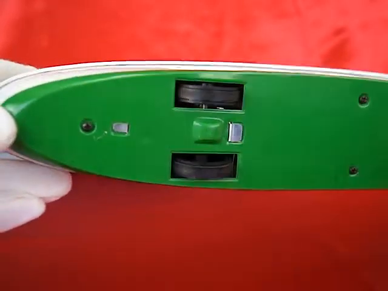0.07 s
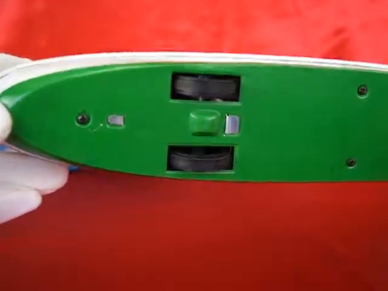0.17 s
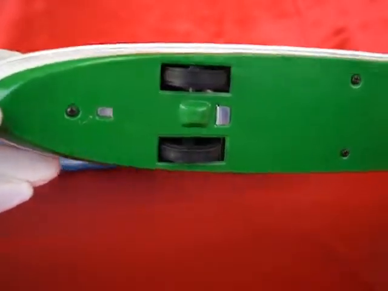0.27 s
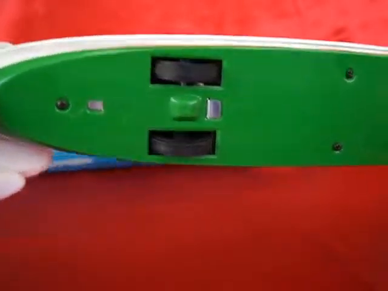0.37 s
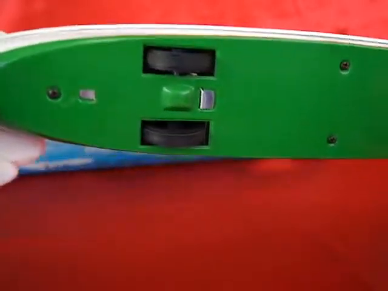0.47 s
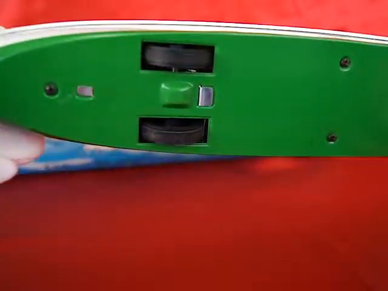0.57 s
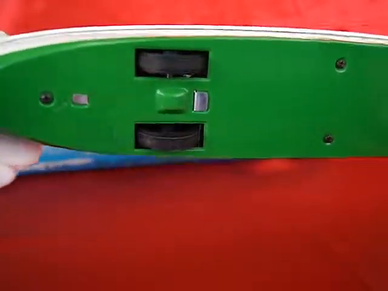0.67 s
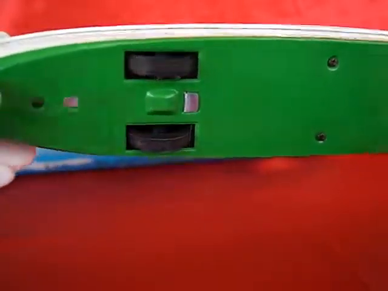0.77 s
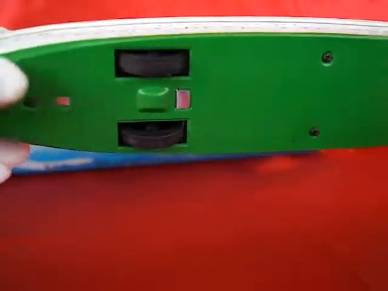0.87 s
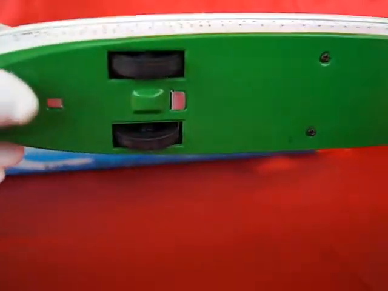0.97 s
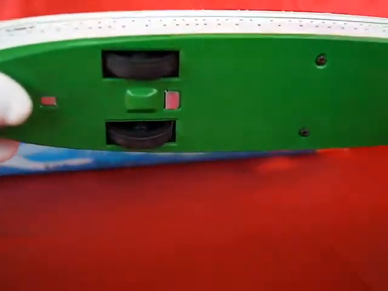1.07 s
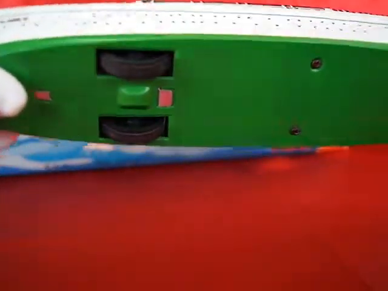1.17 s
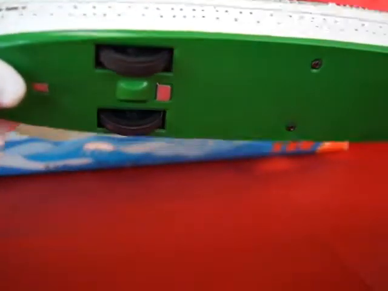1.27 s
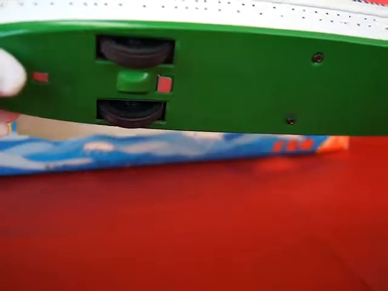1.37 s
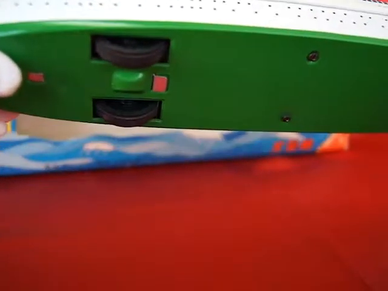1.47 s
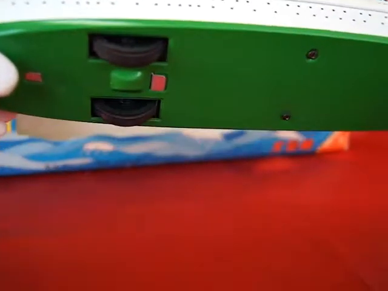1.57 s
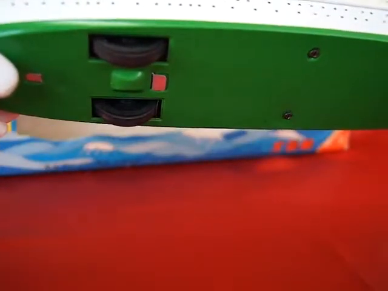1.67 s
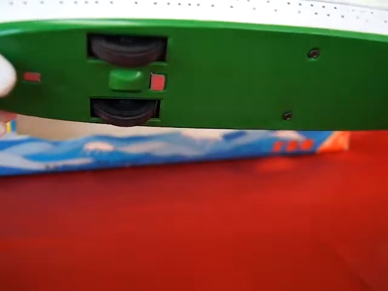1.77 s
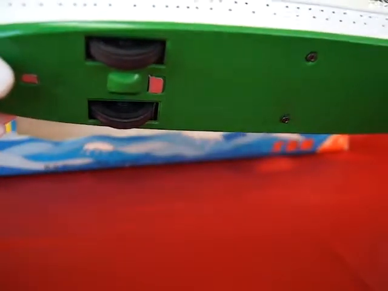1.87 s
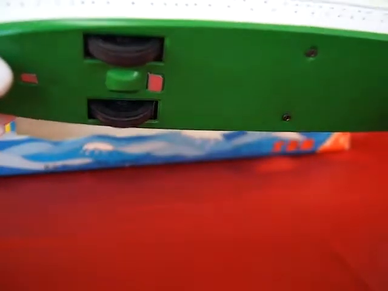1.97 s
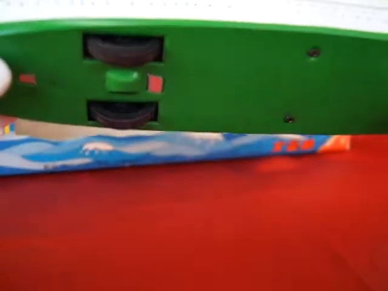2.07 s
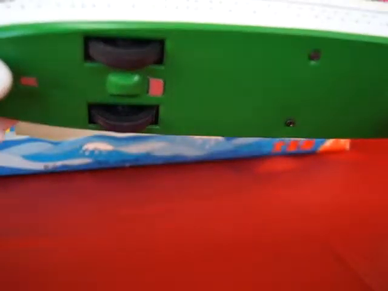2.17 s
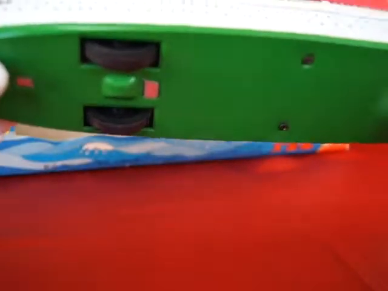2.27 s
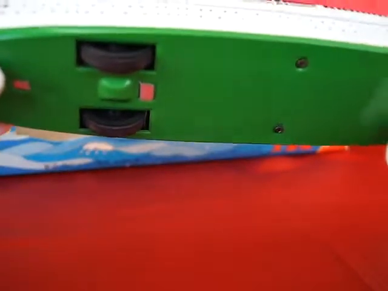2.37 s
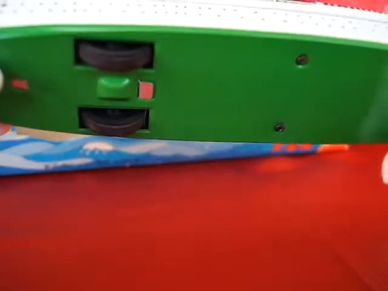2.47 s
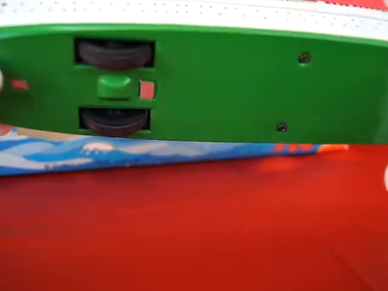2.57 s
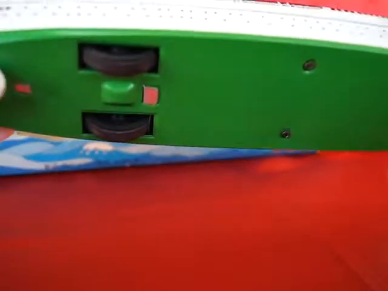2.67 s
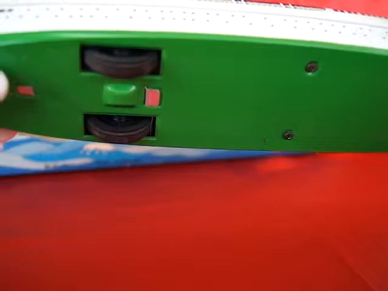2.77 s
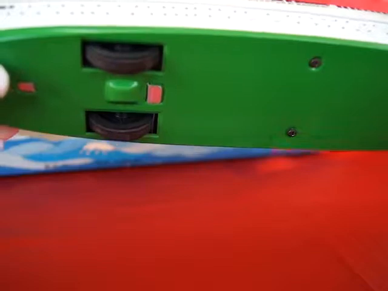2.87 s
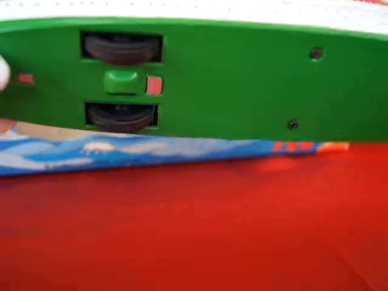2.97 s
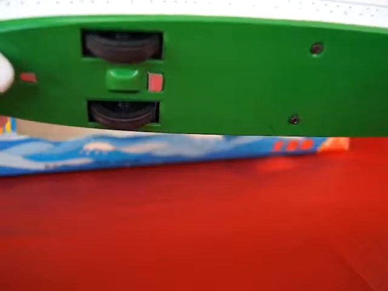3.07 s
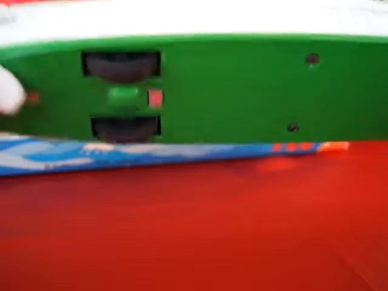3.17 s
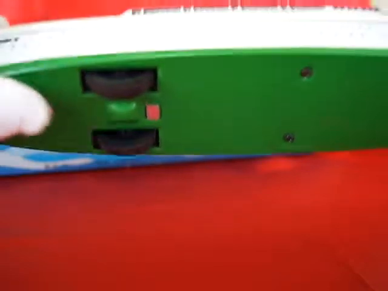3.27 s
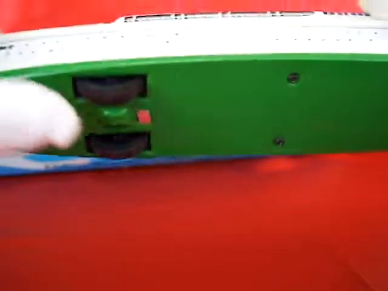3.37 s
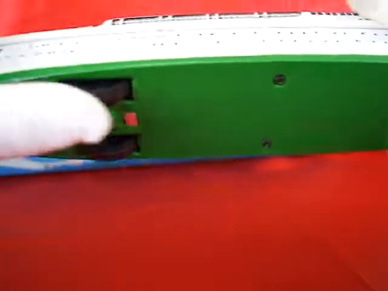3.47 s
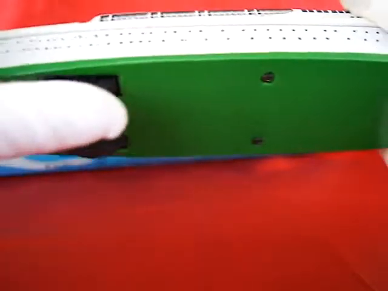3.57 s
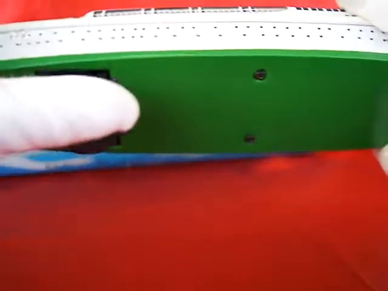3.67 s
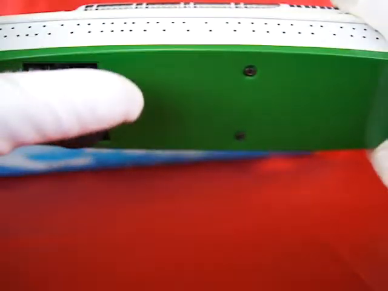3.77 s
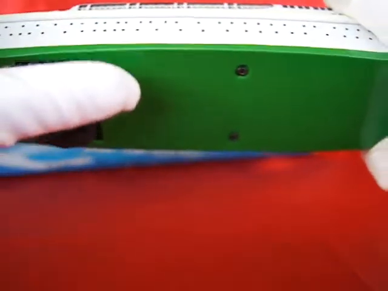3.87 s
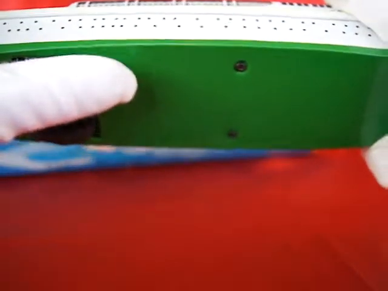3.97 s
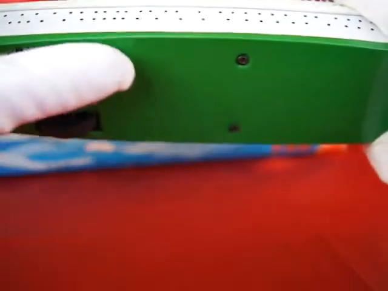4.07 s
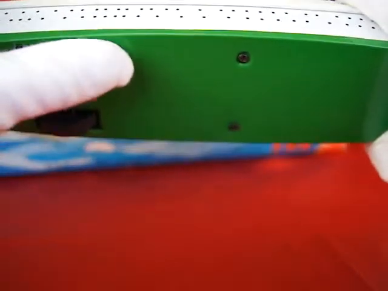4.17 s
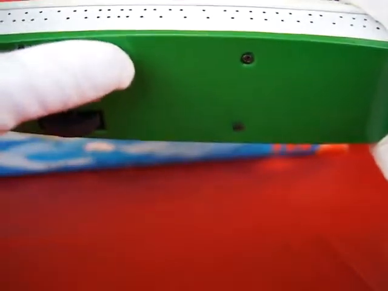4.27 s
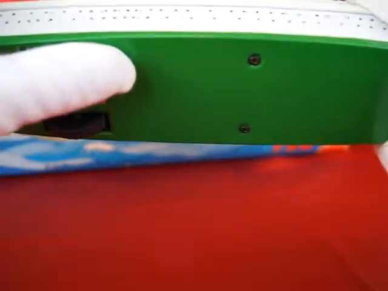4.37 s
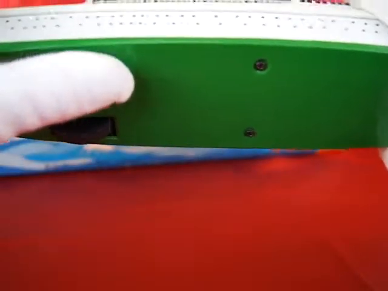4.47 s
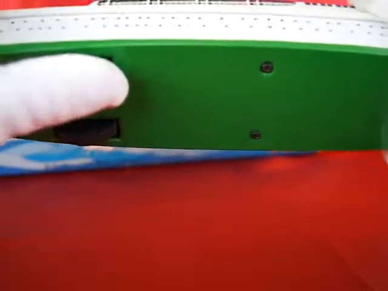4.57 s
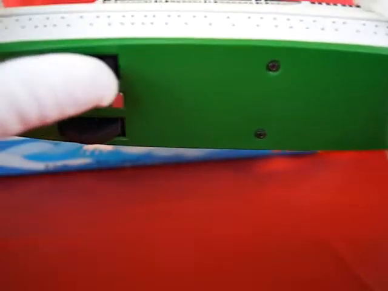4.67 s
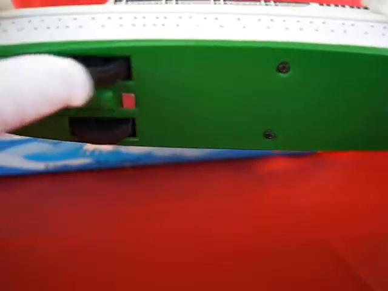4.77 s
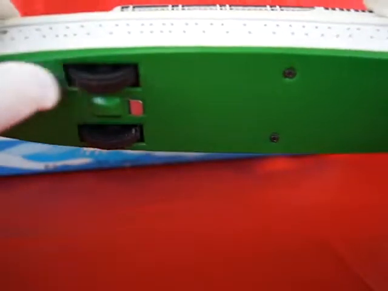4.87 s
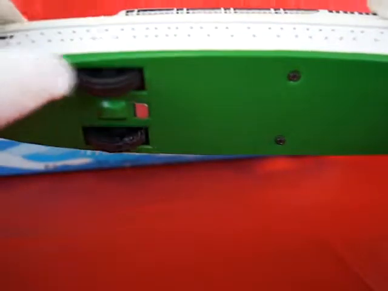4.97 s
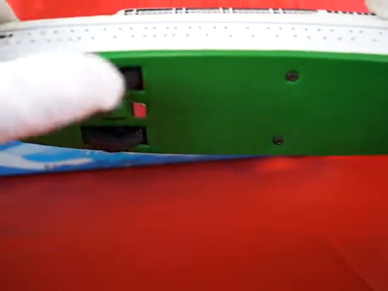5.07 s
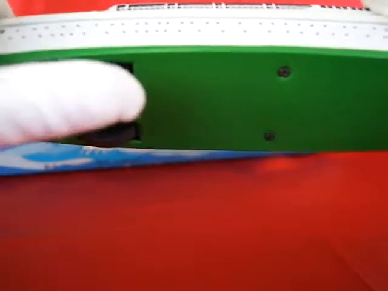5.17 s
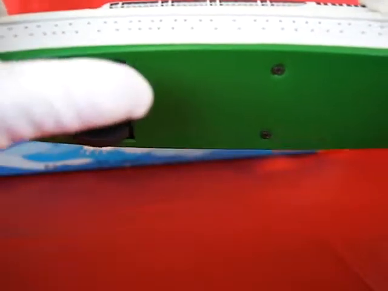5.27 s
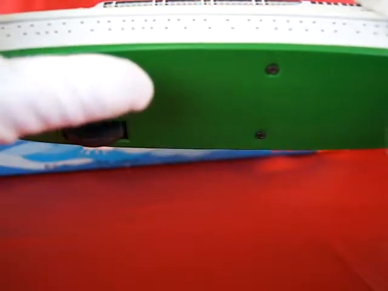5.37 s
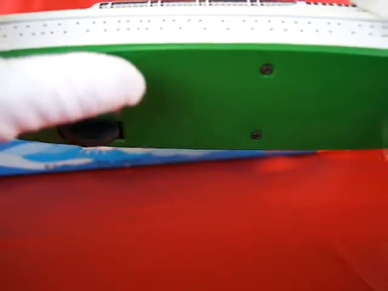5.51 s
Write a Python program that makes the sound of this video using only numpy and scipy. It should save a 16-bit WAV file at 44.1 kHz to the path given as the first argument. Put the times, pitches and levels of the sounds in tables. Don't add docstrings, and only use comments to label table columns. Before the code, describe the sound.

Mostly very quiet indoors: faint hiss, grainy glove friction and a few small taps on tin. Tiny mechanical whirrs, jolts and three sharp lens knocks come from the camera held close. In the last second or so, loose gears start clattering, growing fast into a dense, bright metallic whir with irregular hard slams, shaking the hollow hull; it drops slightly as the thumb lifts and the flywheel runs on.

```python
import sys
import numpy as np
from scipy import signal
from scipy.fft import rfft, irfft
from scipy.io import wavfile
from scipy.ndimage import uniform_filter1d

SR = 44100
rng = np.random.default_rng(int(sys.argv[2]) if len(sys.argv) > 2 else 0)


def master(y):
    cut = np.clip(np.atleast_2d(y).T, -1, 1)
    pcm = np.round(cut * 32767)
    wavfile.write(sys.argv[1], SR, pcm.astype(np.int16))


def attenuation_scalar(level_db):
    decades = np.asarray(level_db, float) / 20
    return 10 ** decades


N = 244314


def rms_one(x):
    return x / np.sqrt(np.mean(x ** 2) + 1e-20)


def in_time(rows):
    s, *columns = np.transpose(rows)
    return [np.interp(np.arange(N) / SR, s, c) for c in columns]


def at_hz(points, hz):
    table_hz, values = np.array(points)[:, 0], np.array(points)[:, 1]
    return np.interp(np.log(hz + 1), np.log(table_hz), values)


def band(x, low_hz, high_hz):
    return signal.sosfilt(signal.butter(3, [low_hz, high_hz], "band", fs=SR, output="sos"), x)


def drift(rate_hz):
    r = np.exp(-2 * np.pi * rate_hz / SR)
    settle = 20000
    wander = signal.lfilter([1], [1, -2 * r, r * r], rng.standard_normal(N + settle))
    return rms_one(wander[settle:])


def stereo_colour(pair, spectrum, likeness):
    hz = np.fft.rfftfreq(pair.shape[1], 1 / SR)
    mid, side = rfft(pair) * attenuation_scalar(at_hz(spectrum, hz))
    alike = np.clip(at_hz(likeness, hz), 0, 1)
    left_right = np.sqrt(1 + alike) * mid + np.sqrt(1 - alike) * side * [[1], [-1]]
    return irfft(left_right, pair.shape[1])


def rings(modes, spread_db):
    t, out = np.arange(4096) / SR, 0
    for k, (hz, width_hz, level_db, pan_db, lead) in enumerate(modes):
        size = (-1) ** k * width_hz * attenuation_scalar(level_db + spread_db * rng.standard_normal())
        sides = np.sin(2 * np.pi * hz * t + np.array([[lead], [0]]))
        sides = sides * attenuation_scalar(pan_db * np.array([[.5], [-.5]]))
        out = out + size * np.exp(-np.pi * width_hz * t) * sides
    return out


def through(force, answer):
    return signal.fftconvolve(force[None], answer, axes=1)[:, :len(force)]


def burst(length_s, chatter):
    force = chatter * rng.standard_normal(4096) * attenuation_scalar(-20 * np.arange(4096) / SR / max(length_s, 1e-4))
    force[0] += 1
    return force


def add(out, s, sound, peak_db):
    i = round(s * SR)
    out[:, i:i + sound.shape[1]] += attenuation_scalar(peak_db) * sound / np.abs(sound.mean(axis=0)).max()


# f/Hz, width/Hz, level/dB, left over right/dB, left lead/rad
HULL_MODES = [(418.2, 29.8, -13.5, -1, 0.26), (491, 92, -14.5, 0.5, 0.18), (720, 25.3, 0.5, -2, 0.07),
              (738, 20.2, -2.5, -3, -0.26), (763, 25.5, 0.76, -1.5, -0.16), (806, 21, -17.5, 11, 2),
              (1028, 37, -18, 3, -0.5), (1198.6, 29, -9.5, -2, 0.47), (1623, 59, -15, 1.5, 0.45),
              (1738, 21, -15, 7.5, 1.33), (1772, 8.6, -8.5, -6.5, -0.06), (2030, 183, -18, -3, -0.34),
              (2588, 39.3, -5, 0.5, -0.6), (2940, 36, -31, -18, 3), (3313, 24, -29, 17, -2.2),
              (3868, 53, -19.5, -3, -1.5), (4064, 39, -18, 15, 2.4), (4200, 27, -13.5, 1.5, 0.8),
              (4165, 18, -20, -8, -9), (4600, 78, -22, -0.5, 2.5), (4678, 54, -23.5, -3, -0.4),
              (5280, 32, -27.5, -18, 1.06), (6440, 96, -27, 5.5, 2.5)]
# f/Hz, level/dB [per Hz]
WEAK_MODES = [(71, -88), (120, -103), (421, -10), (626, 4), (734, -10), (951, -12), (1210, -13), (1390, -7),
              (1760, -16), (2380, -1.5), (2620, 1), (5160, -13), (14000, -46.5)]
# f/Hz, likeness [0 to 1]
WEAK_LIKENESS = [(200, 1), (700, 0.51), (1500, 0.63), (3000, 0.14), (5000, 0.12), (14000, .01)]
# f/Hz, left over right/dB
WEAK_LEAN = [(200, 0), (3000, -1.5), (7000, -4), (8500, -.5), (10500, 8), (12000, 15), (14000, 15)]


def hull_answer(spread_db):
    crowd_db, t60_s = -5.5, 0.21
    lead_in = 64
    dying = attenuation_scalar(-60 * np.arange(-lead_in, 4096 - lead_in) / SR / t60_s) * (np.arange(4096) > lead_in)
    crowd = stereo_colour(rng.standard_normal((2, 4096)) * dying, WEAK_MODES, WEAK_LIKENESS)
    lean_db = at_hz(WEAK_LEAN, np.fft.rfftfreq(4096, 1 / SR)) * np.array([[.5], [-.5]])
    crowd = irfft(rfft(crowd) * attenuation_scalar(lean_db))
    crowd = np.roll(crowd, -lead_in, axis=1) * (np.arange(4096) < 3900)
    strong = band(band(rings(HULL_MODES, spread_db), 290, 6400), 100, 7400)
    return rms_one(strong) + attenuation_scalar(crowd_db) * rms_one(crowd)


# t/s, flywheel vigour level/dB, hull freed from the grip level/dB
WHEEL_DRAG = [
    (4.33, -55.5, 7),
    (4.42, -41.5, 3),
    (4.57, -34.5, 2),
    (4.72, -24, 0.5),
    (4.83, -25.5, -7),
    (4.96, -20.5, 3),
    (5.43, -21, 0),
    (5.465, -27, -5.5),
    (5.54, -30.5, -0.5),
]
# t/s, peak level/dB
TOOTH_SLAMS = [(4.525, -21.5), (4.5647, -37), (4.6293, -12.5), (4.6784, -10.5), (4.7154, -28),
               (4.7517, -19), (4.818, -14), (4.884, -21), (4.9529, -3), (5.063, -25), (5.103, -6.5),
               (5.24, -6), (5.322, -8), (5.5032, -16)]


def gears():
    teeth_per_s, full_spin_db = 2200, -21
    # dB at full spin, dB per dB of vigour, dB per dB of freed hull
    boom, growl, upper = (-19.5, 1.07, 0.58), (-29.5, 0.61, 0.36), (-22.5, 1.5, 0.14)
    sizzle, top = (-36.5, 1.36, .1), (-52.5, 1.64, 0.092)
    t = np.arange(N) / SR
    rattle_db, freed_db = in_time(WHEEL_DRAG)
    boom_db, growl_db, upper_db, sizzle_db, top_db = (
        full_db + follows * (rattle_db - full_spin_db) + share * freed_db
        for full_db, follows, share in (boom, growl, upper, sizzle, top))

    sizes = attenuation_scalar(3.2 * np.minimum(rng.exponential(1, N), 4)) * rng.choice([-1, 1], N)
    hits = sizes * (rng.random(N) < teeth_per_s / SR)
    hits *= attenuation_scalar(1.0 * rms_one(band(rng.standard_normal(N), 18, 90)))
    hits /= np.sqrt(uniform_filter1d(hits ** 2, size=3500) + 1e-9)
    bearing = rng.integers(0, 6, N)
    tin = sum(through(hits * (bearing == k), hull_answer(spread_db=0.0)) for k in range(6))

    run_up_end_s, run_up_s, run_up_db = 4.92, 0.22, -6
    slow = np.clip((run_up_end_s - t) / run_up_s, 0, 1)
    let_go_s, coast_full_db = 5.44, 3.5
    coast_db = coast_full_db * np.clip((t - let_go_s) / 0.043, 0, 1)
    upper_db = upper_db + 0.24 * run_up_db * slow + coast_db
    sizzle_db = sizzle_db + 0.7 * run_up_db * slow + coast_db
    top_db = top_db + run_up_db * slow + np.array([[4.0], [-4.0]])

    parts = [(150, 620, growl_db), (620, 1400, boom_db), (1400, 3300, rattle_db),
             (3300, 6800, upper_db), (6800, 9800, sizzle_db), (9800, 15000, top_db)]
    turning = np.clip((t - WHEEL_DRAG[0][0]) / 0.034, 0, 1)
    clatter = sum(attenuation_scalar(level_db) * rms_one(band(tin, low, high)) for low, high, level_db in parts)
    out = np.pad(turning * clatter, [(0, 0), (0, 4096)])
    for s, peak_db in TOOTH_SLAMS:
        slam = through(burst(0.0015, chatter=0.27), hull_answer(spread_db=0.5))
        add(out, s, band(slam, 1980, 9400), peak_db - 6.0)
    return out[:, :N]


# t/s, peak level/dB, ring level/dB [re dull part], snap level/dB [re dull part],
# contact length/s
FINGER_TAPS = [
    (0.567, -31.5, -0.5, -1.5, 0.01),
    (0.868, -40, -5, -22, 0.022),
    (0.961, -45, -5.5, -16, 0.01),
    (2.74, -38.5, 1.5, -22, 0.019),
    (2.8, -49.5, -8, -16, 0.0055),
    (3.927, -22, -0.5, -1, 0.017),
    (3.952, -36.5, 4, 2, 0.014),
    (4.366, -32.5, -19, -27, 0.0018),
    (4.426, -28.5, -25, -35, 0.0057),
    (4.475, -24, 5, -15, 0.0019),
]


def taps():
    t, out = np.arange(4096) / SR, np.zeros((2, N))
    for s, peak_db, ring_db, snap_db, contact_s in FINGER_TAPS:
        force = burst(contact_s, chatter=0.14)
        sound = through(force, hull_answer(spread_db=6.5))
        dull, ring, snap = band(sound, 560, 950), band(sound, 950, 2300), band(sound, 2300, 13000)
        ring = rms_one(ring) + attenuation_scalar(-7) * rms_one(band(force, 760, 2200))
        snap = rms_one(snap) + attenuation_scalar(-4) * rms_one(band(force, 3400, 5200))
        snap = snap + attenuation_scalar(-14) * rms_one(band(force, 5200, 11000))
        snap *= attenuation_scalar(-60 * t / 0.08)
        dull *= attenuation_scalar(-60 * t / 0.09)
        tap = rms_one(dull) + attenuation_scalar(ring_db) * rms_one(ring) + attenuation_scalar(snap_db) * rms_one(snap)
        add(out, s - .001, tap, peak_db)
    return out


# start t/s, length/s, cruise level/dB, starting kick level/dB, braking swell level/dB
DRIVE_RUNS = [
    (1.942, 0.2, -54.5, 14.5, 4),
    (2.14, 0.06, -52.5, 6, 4),
    (2.355, 0.13, -48.5, -1.5, 2),
    (3.49, 0.088, -52.5, 7, 2),
    (3.639, 0.275, -54, 9.5, 6.5),
    (3.99, 0.082, -51, 11.5, 1),
    (4.195, 0.21, -51, 5.5, 1.5),
]
# f/Hz, width/Hz, level/dB, left over right/dB, left lead/rad
HOUSING_MODES = [(450, 103, 3.5, -11, 4), (1015, 350, -7.5, -4.5, 0.32), (1870, 540, -13.5, -2.5, 1),
                 (2714, 154, -1, 1.5, 1.42), (3000, 70, -1, 5, -1.8), (3090, 70, 0, 0, -1.8),
                 (3820, 180, -9, -8, -.8), (4170, 150, -5, 0, -1.2), (4720, 420, -20, -11.5, 14)]
# t/s, peak level/dB, length/s
DRIVE_JOLTS = [(2.1197, -38.5, 0.027), (2.171, -39.5, 0.0069), (2.357, -47, 0.027), (2.4165, -42, 0.012),
               (2.448, -41, 0.018), (3.493, -38.5, 0.0055), (3.549, -47, 0.025), (3.6416, -42.5, 0.0091),
               (3.659, -55, 0.0092), (3.878, -39.5, 0.011), (4.051, -36.5, 0.019), (4.192, -43.5, 0.018),
               (4.379, -39.5, 0.0038), (4.411, -38, 0.0054)]
# t/s, peak level/dB, f/Hz, time to die by 60 dB/s
LENS_THUDS = [(2.124, -36, 487, 0.075), (2.153, -38.5, 440, 0.089), (2.18, -40.5, 460, 0.035),
              (2.418, -43, 463, 0.13), (2.455, -40, 507, 0.042), (2.47, -43, 414, 0.082),
              (3.494, -45.5, 430, 0.05), (3.554, -39.5, 446, 0.014), (3.646, -41, 450, 0.019),
              (3.877, -42, 544, 0.075), (3.893, -36.5, 454, 0.051), (4.054, -33.5, 523, 0.089)]
# t/s, peak level/dB, ring f/Hz, hiss before level/dB, knock length/s
LENS_KNOCKS = [
    (1.949, -15, 1780, -43.5, 0.0051),
    (2.149, -22, 2030, -43.5, 0.0033),
    (4.002, -17, 1170, -52, 0.0039),
]


def lens():
    step_hz, rough = 195.7, .45
    kick_rise_s, kick_s, brake_s, stop_s = .011, 0.068, 0.031, 0.021
    grumble_db, grumble_follows, drone_db = -10.5, 1.83, -63
    housing, t, out = rings(HOUSING_MODES, 0), np.arange(N) / SR, np.zeros((2, N))
    turn = (step_hz * t + 0.055 * drift(21)) % 1
    rub = rng.standard_normal((2, N)) * (rough + np.exp(-5.0 * turn))
    buzz = through(rub[0], housing) + 0.19 * through(rub[1], housing[::-1])
    whine, grumble = rms_one(band(buzz, 1500, 9000)), rms_one(band(buzz, 650, 1500))
    whine += attenuation_scalar(-22.5) * rms_one(band(rub, 6000, 10500))
    drone = attenuation_scalar(drone_db) * rms_one(band(rub, 183, 640))

    for s, length_s, cruise_db, kick_db, brake_db in DRIVE_RUNS:
        since, left = np.maximum(t - s, 0), s + length_s - t
        strain_db = kick_db * np.clip(since / kick_rise_s, 0, 1) * np.exp(-since / kick_s)
        strain_db = strain_db + brake_db * np.clip(2 - left / brake_s, 0, 1)
        running = np.clip(since / 0.00034, 0, 1) * np.clip(left / stop_s, 0, 1) ** 2
        low_db = cruise_db + grumble_db + grumble_follows * strain_db
        out += running * (attenuation_scalar(cruise_db + strain_db) * whine + attenuation_scalar(low_db) * grumble + drone)

    for s, peak_db, length_s in DRIVE_JOLTS:
        jolt = through(burst(length_s, chatter=0.35), housing)
        add(out, s - .001, band(jolt, 534, 7300), peak_db + 6)

    for s, peak_db, hz, t60_s in LENS_THUDS:
        body = rings([(hz, 3.1 / t60_s, 0, -2.5, .5)], 0)
        add(out, s, through(burst(0.03, chatter=0.12), body), peak_db - 3.0)

    for s, peak_db, hz, hiss_db, length_s in LENS_KNOCKS:
        plate = rings([(hz, 800, .1, 0, 0), (200, 150, -26, 5, 7), (717, 310, 2.4, 18.8, 3.04),
                       (2050, 500, -23, 24, -14.5), (2240, 460, 13.5, 6.9, 4.97),
                       (4100, 1200, 4.5, -0.5, 5.0), (7000, 3000, -31, 0, 5.0)], 0)
        knock = through(burst(length_s * 2.5, chatter=.5), plate)
        add(out, s - .0005, band(knock, 100, 8500), peak_db)
        slide = np.clip(np.minimum((t - s + .0095) / .002, (s + .006 - t) / .005), 0, 1)
        out += attenuation_scalar(hiss_db) * slide * rms_one(band(rng.standard_normal((2, N)), 2300, 8900))
    return out


# middle t/s, length/s, level/dB, lowest f/Hz, highest f/Hz
GLOVE_RUBS = [(0.244, 0.055, -64, 595, 1000), (0.535, .07, -54, 500, 2320), (0.594, 0.033, -59, 1390, 2300),
              (0.861, 0.033, -69, 2440, 5960), (1.21, 0.026, -70, 600, 3200),
              (1.273, 0.072, -63.5, 2500, 6960), (1.526, 0.09, -59.5, 300, 3080),
              (1.722, 0.99, -67, 298, 406), (2.095, 0.0073, -59, 7450, 8500), (2.53, 0.083, -57, 696, 1950),
              (2.634, 0.054, -66, 4000, 4930), (4.262, 0.17, -54.5, 1063, 1125),
              (4.201, 0.034, -46.5, 702, 804), (4.314, .16, -54, 690, 816)]


def rubs():
    out, t = np.zeros((2, N)), np.arange(N) / SR
    fibres = np.array([[0.69, 0.45], [0.37, 1]]) @ rng.standard_normal((2, N)) * attenuation_scalar(1.3 * drift(80))
    for s, length_s, level_db, low_hz, high_hz in GLOVE_RUBS:
        swell = np.exp(-8 * ((t - s) / length_s) ** 2)
        out += attenuation_scalar(level_db) * swell * rms_one(band(fibres, low_hz, high_hz))
    return out


# f/Hz, level/dB [per Hz]
HUSH_COLOUR = [(76, -52), (130, -23), (320, -10), (492, -10.5), (610, -12.5), (713, -8), (1160, -10),
               (1390, -18), (1830, -13), (2350, -14), (2650, -13), (3480, -16.5), (4490, -15.5),
               (14000, -33.5)]
# f/Hz, likeness [0 to 1]
HUSH_LIKENESS = [(100, .99), (200, 0.59), (400, 0.21), (1000, 0.19), (4000, 0.12), (14000, .01)]


def air():
    low_db, high_db = -69, -60.5
    hush = stereo_colour(rng.standard_normal((2, N)), HUSH_COLOUR, HUSH_LIKENESS)
    low = attenuation_scalar(low_db + 0.68 * drift(4.1)) * rms_one(band(hush, 148, 557))
    high = attenuation_scalar(high_db + .5 * drift(20)) * rms_one(band(hush, 650, 18000))
    return low + high


# f/Hz, level/dB [per Hz]
SHAKE_COLOUR = [(10, -9), (25, 2), (50, -14), (100, -28), (140, -25), (400, -70)]
# f/Hz, likeness [0 to 1]
SHAKE_LIKENESS = [(20, 0.73), (100, 1)]


def rumble():
    rest_db, settle_db, settle_s = -94, -74, .07
    drag_db, drag_start_s, drag_rise_s = -67, 4.3, .32
    hum_db = -87
    t = np.arange(N) / SR
    shake = stereo_colour(rng.standard_normal((2, N)), SHAKE_COLOUR, SHAKE_LIKENESS)
    level_db = rest_db + (drag_db - rest_db) * np.clip((t - drag_start_s) / drag_rise_s, 0, 1)
    level = attenuation_scalar(level_db) + attenuation_scalar(settle_db) * np.exp(-t / settle_s)
    hum = rms_one(band(rng.standard_normal(N), 30, 96))
    return level * rms_one(shake) + attenuation_scalar(hum_db) * hum


def scene():
    return gears() + taps() + lens() + rubs() + air()


# f/Hz, width/Hz, depth level/dB
LENS_NOTCHES = [(600, 90, -8), (1380, 220, -9), (2350, 480, -9), (2380, 170, -22), (3480, 320, -8)]


def notched(x):
    for hz, width_hz, depth_db in LENS_NOTCHES:
        a, cos = np.tan(np.pi * width_hz / SR), -2 * np.cos(2 * np.pi * hz / SR)
        kept = a * attenuation_scalar(depth_db)
        x = signal.lfilter([1 + kept, cos, 1 - kept], [1 + a, cos, 1 - a], x)
    return x


def roll_off(x):
    return signal.sosfilt(signal.butter(12, 14120, fs=SR, output="sos"), x)


def record(dry):
    x = signal.sosfilt(signal.butter(3, 200, "high", fs=SR, output="sos"), dry)
    x = notched(x)
    x = signal.sosfilt(signal.ellip(12, .5, 70, 14000, fs=SR, output="sos"), x)
    offset = -0.0026
    return roll_off(x + rumble() + offset)


dry = scene()
out = record(dry)
master(out)
```